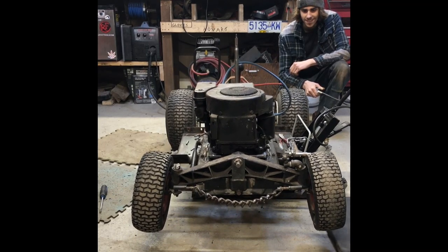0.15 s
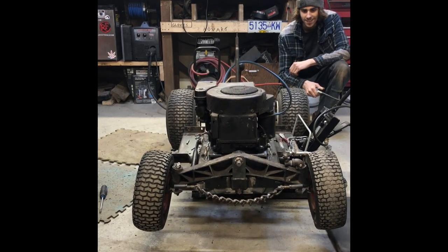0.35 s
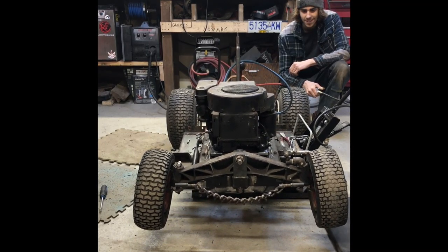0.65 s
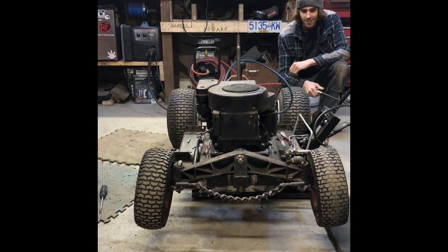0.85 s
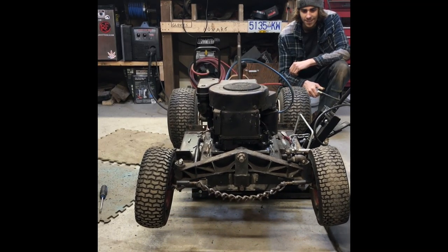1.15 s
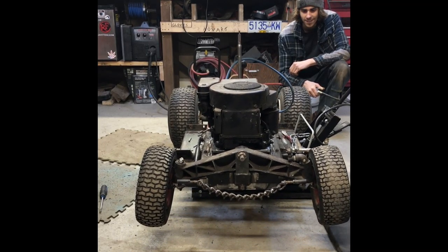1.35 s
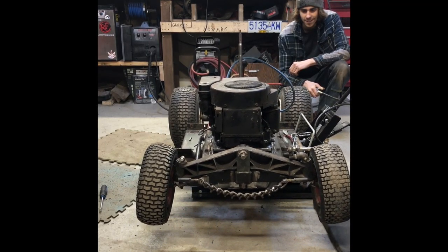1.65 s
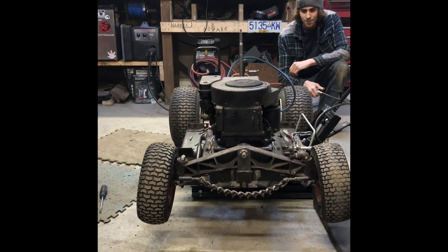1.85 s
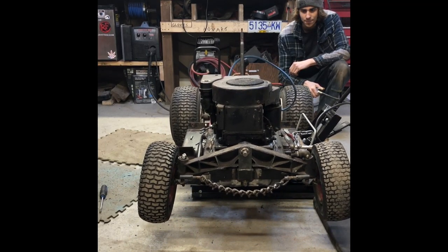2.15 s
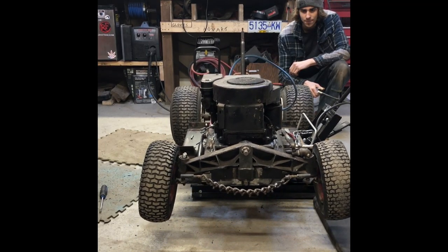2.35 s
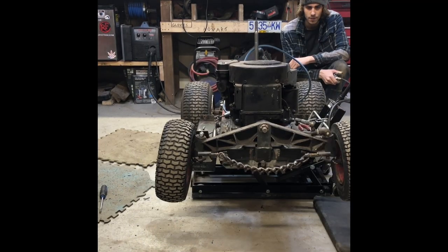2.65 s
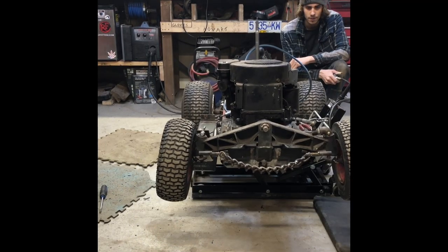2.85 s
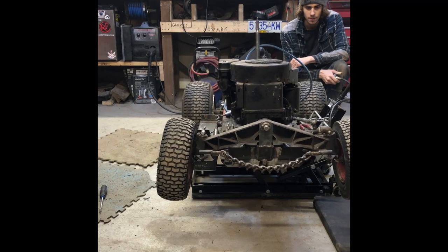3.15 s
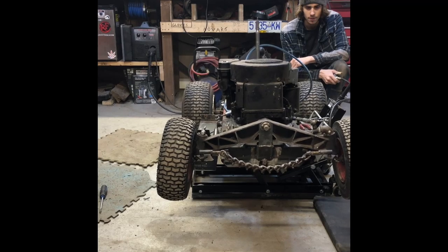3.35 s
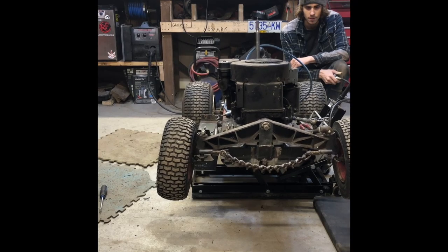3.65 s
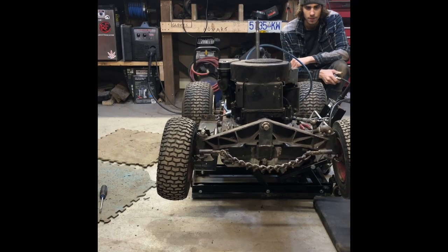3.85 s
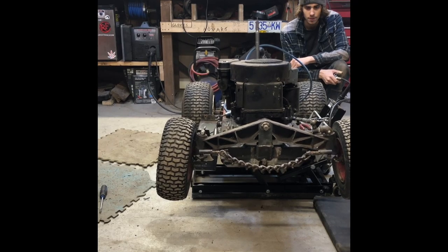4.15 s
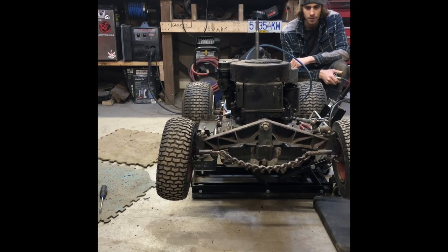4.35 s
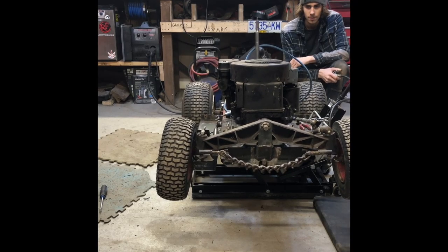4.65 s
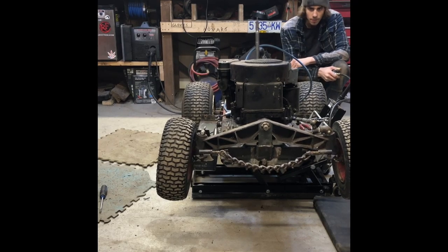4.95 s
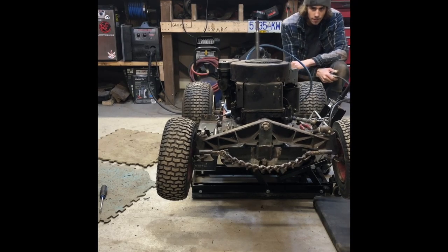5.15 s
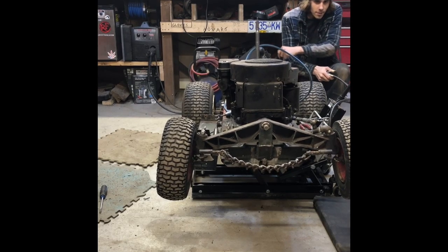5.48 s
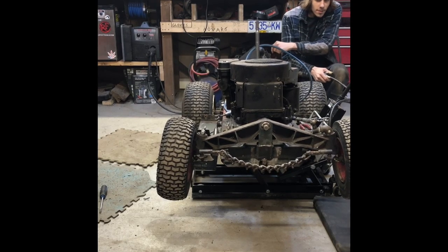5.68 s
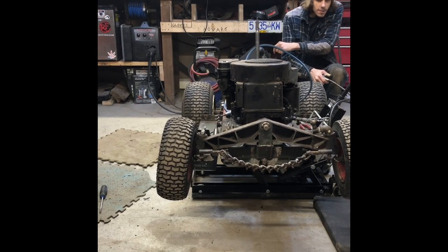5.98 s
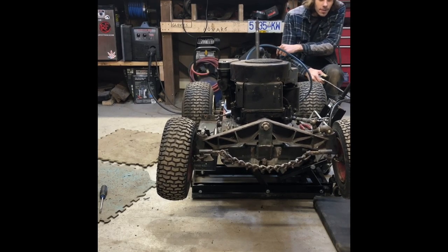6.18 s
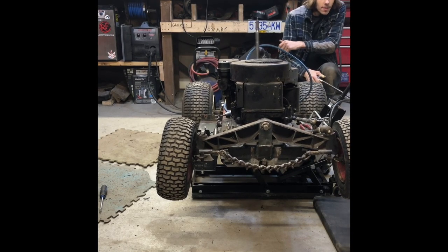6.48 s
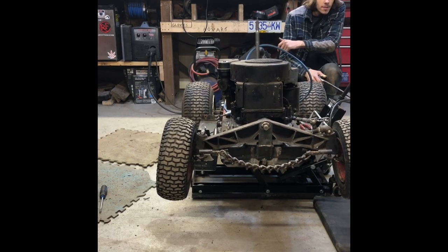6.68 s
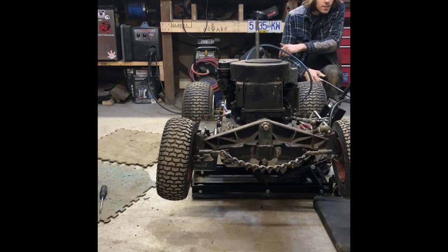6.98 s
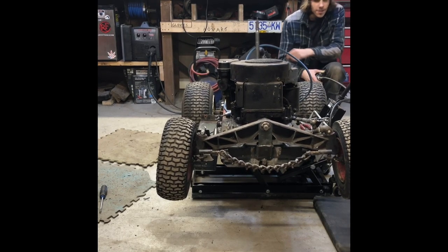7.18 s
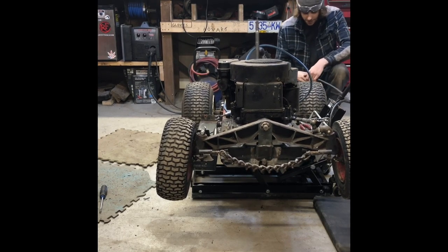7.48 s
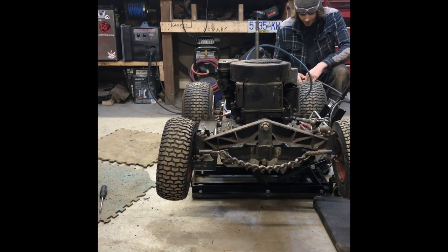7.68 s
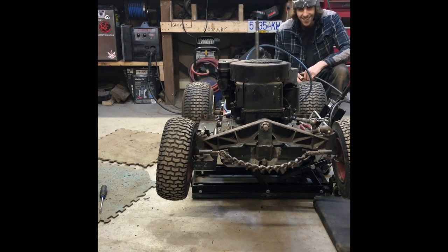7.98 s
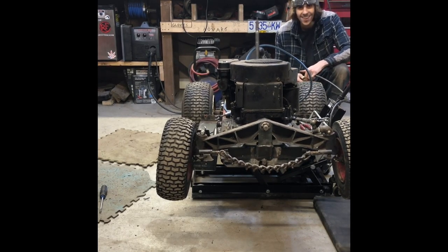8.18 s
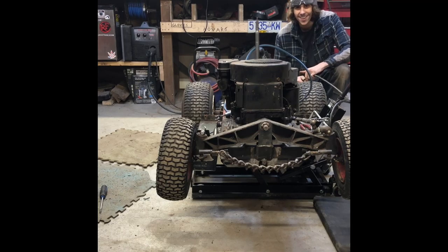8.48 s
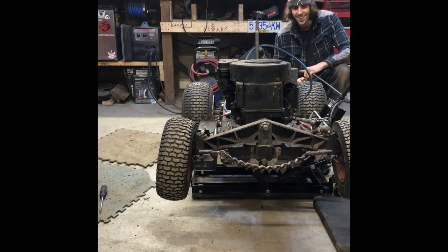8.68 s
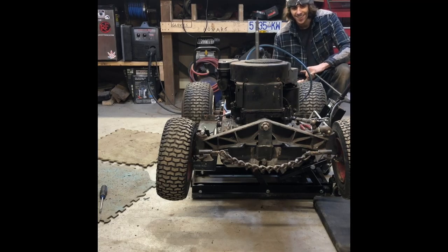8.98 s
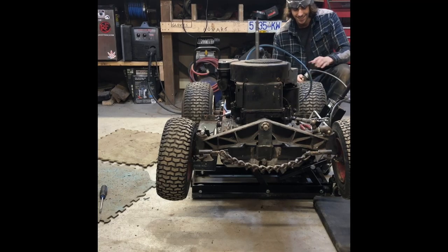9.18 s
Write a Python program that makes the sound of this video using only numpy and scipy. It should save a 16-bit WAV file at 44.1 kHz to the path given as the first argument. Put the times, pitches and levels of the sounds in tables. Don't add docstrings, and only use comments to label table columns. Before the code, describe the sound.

Air-driven pump chuffs rapidly in three bursts with sharp air jets and metal knocks in a concrete garage, then fittings scrape and a hose coupling pops.

```python
import sys
import numpy as np
from scipy import signal
from scipy.fft import rfft, irfft, next_fast_len
from scipy.io import wavfile

SR = 44100
rng = np.random.default_rng(int(sys.argv[2]) if len(sys.argv) > 2 else 0)


def boost(x):
    u = np.asarray(x, float) / 20
    return 10 ** u


def dump(signal):
    limited = np.clip(np.atleast_2d(signal).T, -1, 1)
    pcm = np.round(limited * 32767).astype(np.int16)
    wavfile.write(sys.argv[1], SR, pcm)


N = 411453
T = np.arange(N) / SR
LONG = next_fast_len(N + SR)
HOLES = 4


def rms_one(x):
    return x / np.sqrt(np.mean(x ** 2) + 1e-20)


def at_hz(points, hz):
    table_hz, values = np.array(points)[:, 0], np.array(points)[:, 1]
    return np.interp(np.log(hz), np.log(table_hz), values)


def noise(spectrum, pipes=()):
    hz = np.maximum(np.arange(LONG // 2 + 1) * SR / LONG, 1)
    gain = boost(at_hz(spectrum, hz))
    for centre_hz, width_hz, db in pipes:
        gain = gain * (1 + boost(db) / (1 + (2 * (hz - centre_hz) / width_hz) ** 2))
    random_waves = np.array([1, 1j]) @ rng.standard_normal((2, len(hz)))
    return rms_one(irfft(random_waves * gain, LONG)[:N])


def puffs(times, levels_db, rise, hold, fall):
    flow = np.zeros(N)
    for s, db in zip(times, levels_db):
        i = max(round(s * SR), 0)
        age = np.maximum(T[i:i + SR // 2] - s, 0)
        opening = 1 - np.exp(-age / rise)
        emptying = 1 + np.exp(np.minimum((age - hold) / fall, 50))
        flow[i:i + SR // 2] += boost(db) * opening / emptying
    return flow


def ring(times, levels_db, hz, t60):
    clicks = np.full(N, 1e-18)
    at = np.round(np.asarray(times) * SR).astype(int)
    clicks[at[at >= 0]] = boost(np.asarray(levels_db)[at >= 0])
    r, w = boost(-60 / (t60 * SR)), 2 * np.pi * hz / SR
    return signal.lfilter([0, np.sin(w)], [1, -2 * r * np.cos(w), r * r], clicks)


def burst(timing, supply):
    first, period, slowing, count = timing
    jet_db, sag_db, muffler_db = supply
    k, luck = np.arange(count), rng.standard_normal((count, 3))
    from_rest = k == 0
    s = first + period * k + slowing * k ** 2 / 2
    s = s + .0008 * luck[:, 0] * (k > 0) - .002 * from_rest
    jets_db = jet_db + sag_db * k - 1.2 * from_rest + .25 * luck[:, 1]
    return np.c_[s, jets_db, muffler_db + .6 * luck[:, 2]]


def piston(strokes, contacts):
    # (pitch_hz, level_db, t60_s)
    body = [(55.7, -7.5, 0.209), (76.1, -10.5, 0.17), (94.5, 4, 0.11), (151.3, -4, 0.21), (204, -3, .08)]
    s, jet_db, _ = np.transpose(strokes)
    times = np.concatenate([s + lag for lag, boom_db, ring_db in contacts])
    out = 0
    for k, (hz, db, t60) in enumerate(body):
        column = 2 if k else 1
        blows_db = np.concatenate([jet_db + row[column] for row in contacts])
        out = out - ring(times, blows_db + db + rng.normal(0, 1.08, len(times)), hz, t60)
    return out


def pump(strokes):
    # (pitch_hz, level_db per Hz)
    jet_colour = [(1470, -23.5), (2500, -13.5), (2850, -14.5), (4200, -7.5), (4750, -6), (6430, -1),
                  (8360, -1), (10100, 2), (14600, -2.5), (15900, -5)]
    # (pitch_hz, width_hz, level_db)
    outlet_pipes = [(1424, 250, 4), (4200, 500, -9), (695, 34, -11.5), (11300, 440, -14.5),
                    (493, 36, -12.5)]
    # (pitch_hz, level_db per Hz)
    muffler_colour = [(71, -43), (120, -3.5), (177, -9.5), (204, -4.5), (336, -4), (608, 0.5), (971, 0.5),
                      (1140, 0), (1390, -2), (2120, -3), (2850, -4.5), (4210, -2), (5000, -30),
                      (6500, -33.5), (11000, -120)]
    s, jet_db, muffler_db = np.transpose(strokes)
    jet_flow = puffs(s - .003, jet_db - 17.5, rise=0.0031, hold=0.032, fall=0.0077)
    roar_flow = puffs(s - .002, jet_db + muffler_db - 25.2, rise=0.010, hold=.046, fall=0.016)
    jet, roar = noise(jet_colour, outlet_pipes), noise(muffler_colour, outlet_pipes)
    holes = []
    for k in range(HOLES):
        shift = k * SR
        holes.append(jet_flow * np.roll(jet, shift) + roar_flow * np.roll(roar, shift))
    return np.array(holes)


def garage_tails(wet_db):
    # (pitch_hz, t60_s)
    echo_time = [(60, .6), (300, 0.72), (1500, 0.6), (5000, 0.51), (10000, 0.33), (16000, 0.21)]
    age, tail = np.arange(SR * 3 // 4) / SR, 0
    white = rng.standard_normal((2, HOLES, len(age)))
    edges = 30 * 2 ** np.arange(0, 9.6, .5)
    for k, (low, high) in enumerate(zip(edges, edges[1:])):
        band_filter = signal.butter(2, [low, high], "band", fs=SR, output="sos")
        band = signal.sosfilt(band_filter, white[k % 2])
        t60 = at_hz(echo_time, np.sqrt(low * high))
        tail = tail + band * boost(-60 * age / t60) / np.sqrt(t60)
    tail = tail * (1 - np.exp(-age / 0.0058))
    tail = boost(wet_db) * tail / np.sqrt(np.sum(tail ** 2, axis=1, keepdims=True))
    tail[:, 0] = 1
    return rfft(tail, LONG)


def garage(paths, tails):
    return irfft(np.sum(rfft(paths, LONG) * tails, axis=0), LONG)[:N]


def background():
    # (pitch_hz, level_db per Hz)
    furnace = [(12, -33.5), (20, -15.5), (68, -18), (145, -11), (254, -15.5), (277, -10), (387, -10),
               (541, -13.5), (605, -13.5), (972, -15.5), (1290, -13), (1900, -25.5), (2130, -23),
               (6880, -40), (15900, -47)]
    # (pitch_hz, width_hz, level_db)
    flue = [(1450, 92, 3), (620, 7.9, 10.5), (2270, 130, -4), (4200, 740, -1.5), (6000, 800, -3),
            (15340, 200, -1.5), (291, 12, -3.5), (392, 7.6, 0), (728, 13, 2)]
    # (start_s, length_s, pitch_hz, level_db, change_db_per_s)
    hum = [
        (2.52, 0.22, 115, -70, 12),
        (3.853, 0.11, 95, -57, -5),
        (4.69, .27, 98, -69, 3),
        (7.05, 0.66, 93, -60, -17),
        (8.58, .32, 112, -61, -37),
    ]
    # (start_s, level_db, t60_s)
    jolts = [
        (0, -45, .8),
        (2.5, -66, 2),
        (8.5, -59, .4),
    ]
    drone, shake = 0, boost(-71)
    for s, length, hz, db, db_per_s in hum:
        edges = np.clip(np.minimum(T - s, s + length - T) / .04 + .5, 0, 1)
        level = boost(db + db_per_s * np.clip(T - s, 0, length))
        drone = drone + edges * level * np.sin(2 * np.pi * hz * T)
    for s, db, t60 in jolts:
        shake = shake + (T >= s) * boost(db - 60 * np.maximum(T - s, 0) / t60)
    rumble = shake * noise([(10, -15), (24, 2), (45, -5.5), (70, -16), (120, -45), (400, -120)])
    sway = boost(-47 - 2.5 * T) * noise([(1, -6), (2, 0), (5, -8), (12, -40), (30, -120)])
    return boost(-56.5) * noise(furnace, flue) + np.sqrt(2) * drone + rumble + sway


def lever():
    # (start_s, first_vent_s, open_db, vent_db)
    inlet = [
        (2.717, 2.83, -45, -43),
        (4.885, 4.963, -46, -38),
    ]
    # (pitch_hz, level_db per Hz)
    inlet_colour = [(1060, -47), (1800, -7), (2370, -14), (2710, -11.5), (7000, -5.5), (8250, -1),
                    (10600, -4), (15200, -7.5), (15900, -7.5)]
    # (start_s, level_db)
    spool = [
        (2.798, -41),
        (4.945, -42),
    ]
    flow = 0
    for s, vent, db, vent_db in inlet:
        times = [s, s + .02, s + .02 + 0.0065, vent - 0.032, vent]
        levels_db = [db - 14, db - 14 + 4.5, db, db, vent_db]
        flow = flow + boost(np.interp(T, times, levels_db, left=-200, right=-200))
    s, db = np.transpose(spool)
    ping = ring(s, db, 1560, 0.095) + ring(s + 0.0034, db, 1490, 0.061) + ring(s, db - 5.0, 3800, .04)
    return boost(-2.5) * flow * noise(inlet_colour) + ping


def fittings():
    # (start_s, level_db, pitch_hz,
    # length_s)
    scrapes = [(7.409, -69, 8000, .045), (7.409, -71.5, 5500, .038), (7.585, -67, 11300, .02),
               (7.613, -59, 4200, 0.047), (7.61, -67, 15000, .044), (7.61, -60, 8600, .025),
               (7.611, -67, 11000, .04), (7.664, -61.5, 1530, 0.05), (8.376, -48.5, 1580, 0.029),
               (8.388, -64, 3980, .038), (8.593, -45, 1810, .02)]
    # (start_s, level_db, brightness_db, length_s)
    scuffs = [
        (7.409, -68, 2.5, .038),
        (7.583, -65, 4.5, .02),
        (7.607, -54.5, 9.5, 0.03),
        (7.664, -52, -8, 0.05),
        (8.377, -62, -12, .044),
        (8.48, -58, 2, .04),
        (9.0, -82, 6.5, .1),
    ]
    # (pitch_hz, level_db per Hz)
    pop_colour = [(24, -41), (40, -12), (167, -5), (262, -7), (328, -2.5), (678, -5), (808, -7.5),
                  (1120, -12), (1330, -6), (2820, -8), (3630, -5), (4110, -8.5), (6790, -7.5), (15900, -13)]
    # (pitch_hz, width_hz, level_db)
    coupling = [(1850, 340, -5), (3780, 350, -9), (6740, 240, -11), (107, 45, -2), (277, 83, -1.5)]
    pop_s = 8.511
    white, out = rng.standard_normal(N), np.zeros(N)
    dull = noise([(300, -1), (1600, 6.0), (2800, -10.0), (4200, -2.0), (7000, -12.0), (16000, -28)])
    bright = noise([(2000, -30), (4200, -7), (8500, 1), (11000, 1), (13500, -12), (15000, -4), (17000, -10)])
    r = np.exp(-np.pi * 230 / SR)
    for s, db, hz, length in scrapes:
        part = slice(int(s * SR), int(s * SR) + SR // 2)
        resonance = [1, -2 * r * np.cos(2 * np.pi * hz / SR), r * r]
        band = rms_one(signal.lfilter([1, 0, -1], resonance, white[part]))
        out[part] += puffs([s], [db], rise=0.0038, hold=length, fall=length / 3)[part] * band
    for s, db, bright_db, length in scuffs:
        rub = puffs([s], [db], rise=0.002, hold=length, fall=length / 3)
        out += rub * (dull + boost(bright_db - 8.5) * bright)
    out += ring([8.468, 8.505, 8.53], [-56, -48, -50], 140, .2)
    out += ring([8.44, 8.51], [-58, -50], 456, 0.16)
    pop = puffs([pop_s], [-25], rise=0.0084, hold=0.015, fall=0.016) * noise(pop_colour, coupling)
    seep = boost(-81) * (T > pop_s) * np.exp(-np.maximum(T - pop_s, 0) / 1.5) * bright
    return out + pop + seep


def scene():
    # (first_vent_s, stroke_s, each_stroke_longer_by_s, stroke_count)
    bursts = [
        (-.2708, .09374, .0000264, 29),
        (2.828, .09826, .000147, 11),
        (4.9639, .09894, .000258, 21),
    ]
    # (jet_db, sag_db per stroke, muffler_db relative to jet)
    supplies = [
        (-5.5, -0.0269, -0.6),
        (-7, -0.1139, -1.3),
        (-8, -0.0414, -1),
    ]
    # (time_from_vent_s, boom_db, frame_ring_db)
    knocks = [
        [(-.007, -32.5, -39.5), (-.002, -45, -35.5), (0.01, -50, -50.5), (.035, -47.5, -46)],
        [(-.0065, -46, -37.5), (-.002, -52.5, -41), (.011, -55, -41), (.0355, -53.5, -35.5)],
    ]
    one, two, three = [burst(timing, supply) for timing, supply in zip(bursts, supplies)]
    late_stroke = (2.348, -8.5, 0)
    after = np.vstack([late_stroke, two, three])
    near = pump(after)
    near[0] += lever() + fittings()
    still, tails = background(), garage_tails(wet_db=1.0)
    first = garage(pump(one), tails) + piston(one, knocks[0]) + still
    second = garage(near, tails) + piston(after, knocks[1]) + still
    cut_s, fade_in_s, fade_length_s = 2.4222, 2.4535, .034
    fade = np.clip((T - fade_in_s) / fade_length_s, 0, 1)
    return (first * (T < cut_s) + second * fade)[None]


def band_limit(x):
    return signal.sosfilt(signal.butter(12, 16050, fs=SR, output="sos"), x)


def record(dry):
    rounded = 1.703 * np.tanh(dry / 1.32)
    top_cut = signal.ellip(10, .5, 70, 15850, fs=SR, output="sos")
    return band_limit(signal.sosfilt(top_cut, rounded))


dry = scene()
out = record(dry)
dump(out)
```